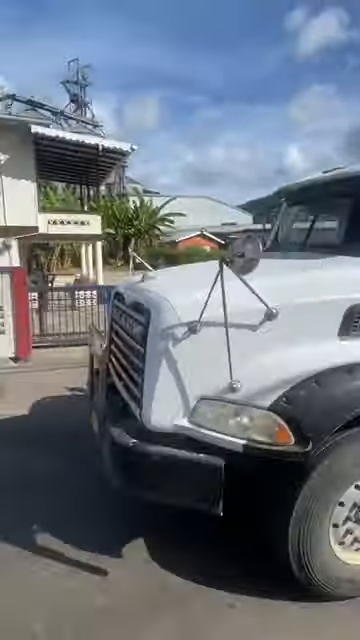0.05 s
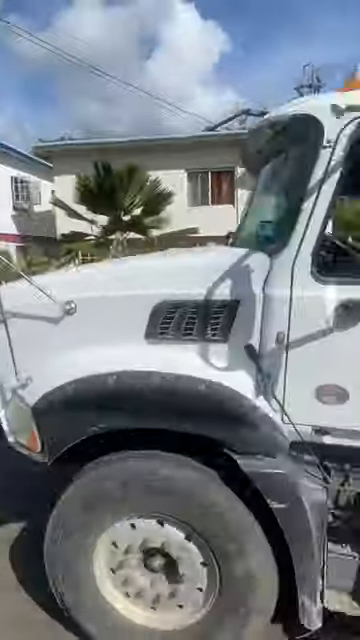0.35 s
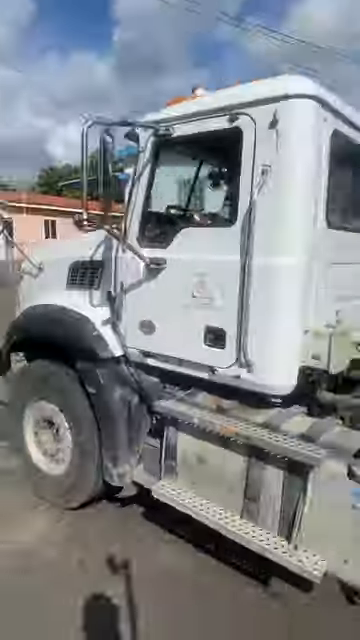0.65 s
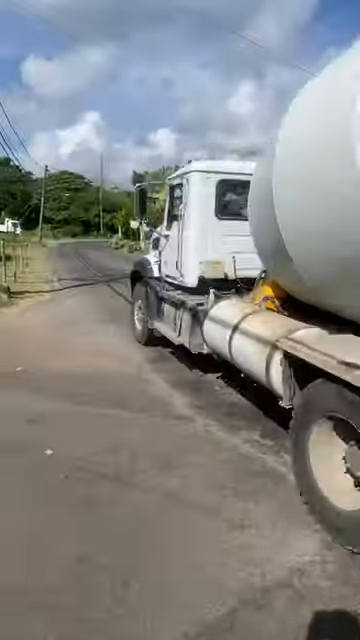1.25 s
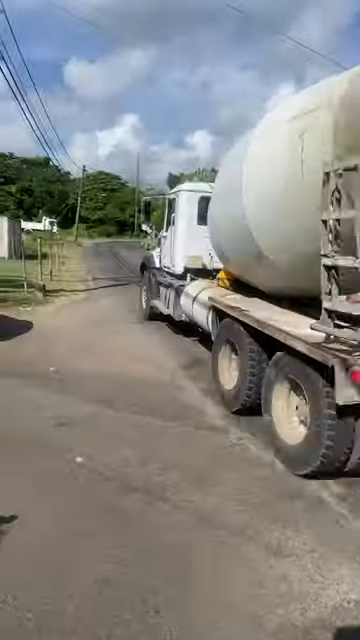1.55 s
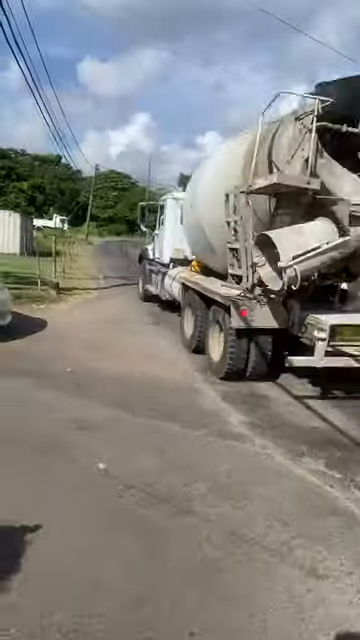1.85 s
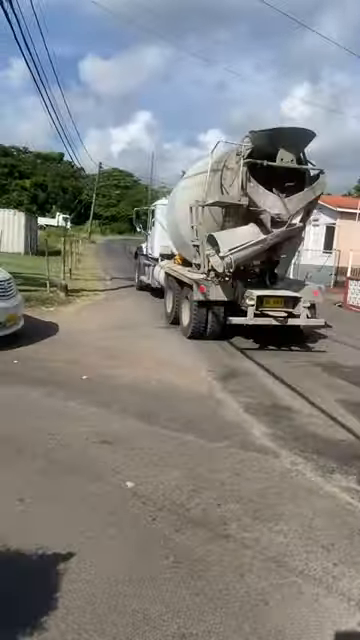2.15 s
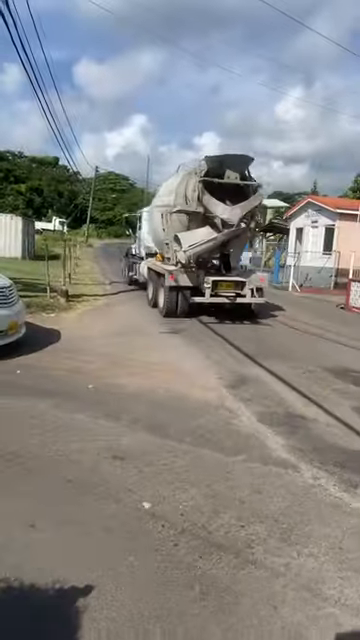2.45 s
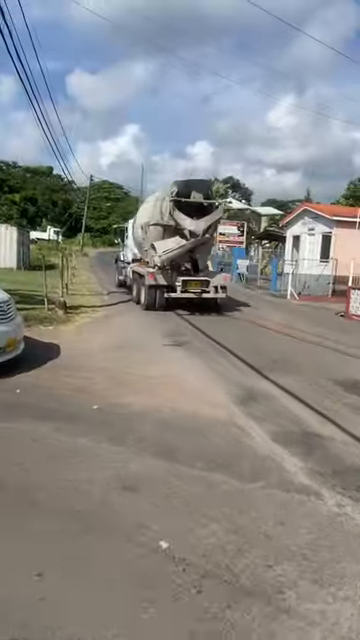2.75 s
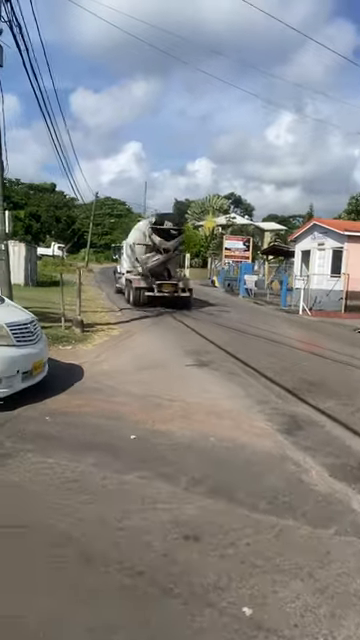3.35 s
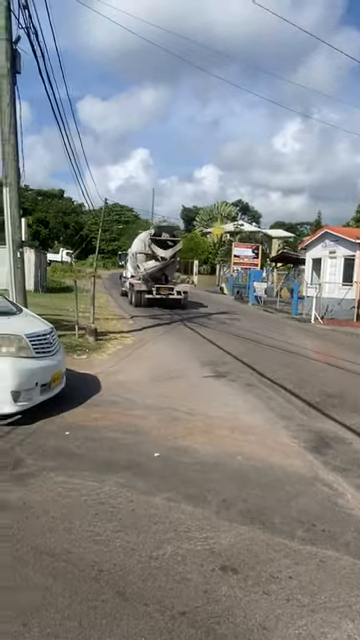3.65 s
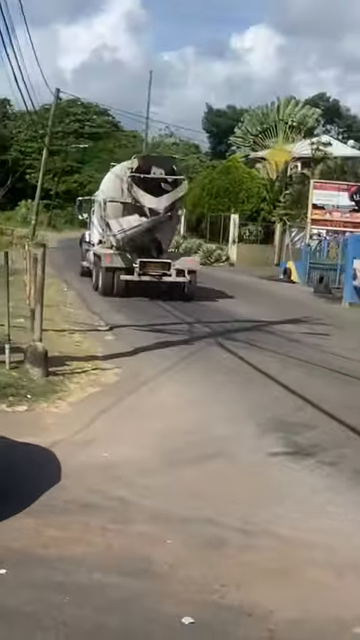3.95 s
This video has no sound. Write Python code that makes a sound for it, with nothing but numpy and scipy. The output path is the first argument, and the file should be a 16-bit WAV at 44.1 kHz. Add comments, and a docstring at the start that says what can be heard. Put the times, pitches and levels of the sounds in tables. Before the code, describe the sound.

Heard in stereo from the roadside, a heavy mixer truck drives close by with diesel rumble, rattling, hiss and tyre noise. Short metallic squeaks and clanks follow, then engine and exhaust grow fainter as it moves off.

```python
"""Concrete mixer truck passing close

From the roadside, in stereo: the truck goes by the microphone and pulls away, easing off at the
very end. Its six-cylinder diesel drones over block rumble, clatter, rattling metal and tyre roar.
Air hisses at the front; something on the turning drum or rear axles scrapes and squeaks as the back
passes, the chassis clanks, and exhaust and tyres rasp from up the road."""
import sys
import numpy as np
from scipy import signal
from scipy.fft import rfft, irfft
from scipy.io import wavfile
from scipy.ndimage import uniform_filter1d, minimum_filter1d

SR = 44100
rng = np.random.default_rng(int(sys.argv[2]) if len(sys.argv) > 2 else 0)


def int16_out(signal):
    """Quantize to a 16-bit WAV file."""
    q = np.round(np.clip(np.atleast_2d(signal).T, -1, 1) * 32767)
    wavfile.write(sys.argv[1], SR, q.astype(np.int16))


N = 176400
TIME, HZ = np.arange(N) / SR, np.fft.rfftfreq(N, 1 / SR)

# engine speed: t/s, firing rate/Hz
FIRING_RATE = [(0, 61.7), (.25, 59.8), (.5, 62.3), (1.4, 60.9), (2, 63), (2.75, 64.5), (3.35, 64.8),
               (3.58, 68.6), (3.9, 65)]
# strong engine tones at 0.99, 2 and 2.5 times the firing rate: t/s, level/dB
FIRING_DB = [(0, -17.5), (.6, -18), (.95, -16.5), (1.25, -18.5), (1.65, -28), (2.04, -30), (2.27, -23.5),
             (2.65, -21), (3.2, -25.5), (3.6, -22), (3.85, -33)]
OCTAVE_DB = [(.08, -19), (.25, -16.5), (.5, -25), (.72, -32), (.9, -24.5), (1.2, -21.5), (1.37, -29),
             (1.5, -19.5), (1.9, -18), (2.48, -21.5), (2.63, -16), (3.15, -24), (3.32, -31), (3.47, -23),
             (3.7, -29)]
HALF_ORDER_DB = [(0, -28), (.5, -23.5), (1.05, -24), (1.35, -44), (1.9, -29), (4, -33)]
# weak engine tones: multiple of the firing rate, level/dB relative to RUMBLE_DB
WEAK_ORDERS = [(3.5, -17.5), (5, -18), (5.25, -16)]
# whine of an engine-driven fan or pump: t/s, level/dB
WHINE_DB = [(0, -21), (.5, -23.5), (.75, -36), (2, -43.5), (2.8, -29.5), (3.5, -40.5)]
# block rumble, diesel clatter, air at the front, rasp from behind: t/s, level/dB before trim
RUMBLE_DB = [(0, -20.5), (.68, -22), (1.25, -19.5), (1.5, -24.5), (1.72, -22.5), (2.2, -29), (2.7, -26),
             (3.02, -30), (3.2, -24.5), (3.5, -30.5)]
CLATTER_DB = [(0, -27.5), (.7, -29), (1.27, -29.5), (1.5, -38), (1.72, -32), (1.88, -33.5), (2.2, -43.5),
              (4, -40.5)]
HISS_DB = [(0, -29.5), (.13, -30.5), (.23, -38), (.85, -39.5), (1.5, -45.5), (1.9, -45.5), (2.1, -55),
           (4, -59.5)]
RASP_DB = [(1.7, -70), (2.1, -38.5), (2.45, -40.5), (2.65, -36.5), (3.15, -39), (3.55, -41), (4, -45.5)]
# engine bay growl alongside, tyre roar, low rumble on easing off: t/s, level/dB
GROWL_DB = [(0, -28.5), (.5, -23), (.9, -39.5), (1.5, -63)]
TYRE_DB = [(0, -23), (.3, -26.5), (.95, -23.5), (1.3, -26), (1.52, -29.5), (1.7, -26.5), (2.1, -32.5),
           (2.45, -33.5), (2.7, -31.5), (2.95, -29.5), (3.25, -34.5), (4, -36)]
EASING_DB = [(3.4, -60), (3.8, -26.5)]
# spectra of those seven noises: f/Hz, relative level/dB
RUMBLE_SPECTRUM = [(20, -32), (40, -14.5), (75, -1.5), (105, -1.5), (180, -1.5), (240, 0), (400, -3),
                   (520, -11), (700, -16.5), (1200, -53)]
CLATTER_SPECTRUM = [(1100, 3), (1800, -1), (2200, 3), (2700, 0.5), (3300, -2.5), (4100, -4), (4800, -10),
                    (6200, -8.5), (8000, -76)]
HISS_SPECTRUM = [(3000, -20), (5500, -4), (7300, -1.5), (9200, 0), (11000, -2), (13000, -3), (14000, -7),
                 (15700, -10)]
RASP_SPECTRUM = [(900, -14), (1500, 0), (1850, -4), (2250, 1), (2700, -2), (3280, -16), (4300, -.5),
                 (5000, -7.5), (6000, -8), (7200, -13), (9000, -13), (13000, -20), (15500, -42)]
GROWL_SPECTRUM = [(250, -44), (380, 6), (470, 3), (600, 4), (750, -26), (1200, -40)]
TYRE_SPECTRUM = [(250, -9.5), (500, -4), (700, -1.5), (900, 1.5), (1150, -1.5), (1450, -5.5), (1700, -5),
                 (2100, -13.5), (3200, -43)]
EASING_SPECTRUM = [(25, -17), (60, 7), (200, -48)]
# resonances of the shaken parts and of the rubbing metal: f/Hz, width/Hz, relative level/dB
RATTLE_MODES = [(1130, 70, 1), (2270, 200, 0), (2950, 130, -4), (4350, 300, -4)]
SCRAPE_MODES = [(2230, 170, -1), (2520, 170, -1), (3900, 500, -3.5), (5260, 130, -1.5), (6100, 400, -9),
                (10700, 500, -13)]
# rattle and scrape as they pass the microphone: t/s, gain/dB
RATTLE_DB = [(0, -34.5), (1.2, -34.5), (2.2, -43.5), (2.7, -43.5), (4, -50)]
SCRAPE_DB = [(0, -69), (.7, -57), (1, -39.5), (1.35, -38.5), (1.55, -43), (1.63, -36.5), (1.92, -35.5),
             (2.15, -48), (2.6, -75)]
# squeaks of the rubbing metal: t/s, level/dB, f/Hz
SQUEAKS = [(.975, -33, 5350), (1.04, -33, 5280), (1.1, -28.5, 5210), (1.17, -24.5, 5290),
           (1.272, -30, 5210), (1.342, -30, 5240), (1.62, -27, 5310), (1.684, -23.5, 5190),
           (1.763, -27, 5170), (1.84, -32, 5200), (1.962, -31, 5130)]
# chassis knocks: t/s, level/dB, f/Hz, strength of the crack (0-1)
KNOCKS = [(1.686, -26, 2500, 1), (1.745, -25, 2000, .2), (1.753, -25, 3950, .2), (1.857, -25, 2220, .5),
          (1.958, -28, 2470, .3), (2.06, -30, 2200, .1)]
# stereo image, with left and right nearly opposed around 7-8 kHz:
# f/Hz, left minus right/dB, coherence (0-1), phase lead of the left/rad
STEREO_IMAGE = [(60, -.7, 1, -.18), (125, -2.4, .998, -.07), (330, -5.5, .99, -.15), (520, -5.5, .9, -.4),
                (640, -6.5, .6, -1), (740, -9, .3, 0), (870, -9, .65, .4), (1200, -4, .8, .1),
                (1750, 0, .98, 0), (2200, -1, .5, 0), (2900, -1.5, .15, 0), (4100, -2, .5, 1.1),
                (5200, -3, .7, .6), (6100, 0, .65, 1.7), (6750, 0, .95, 2.8), (7900, 0, .95, 3.4),
                (8600, 0, .65, 4.6), (10000, 0, .9, 6.2), (11400, 0, .9, 6.3), (13100, 0, .95, 9.2),
                (14600, 0, .9, 9.6), (15400, 0, .8, 12)]


def engine_drone(firings):
    """Tones locked to the firing rate, a throb from unequal cylinders, and a fan or pump whining."""
    def tone(multiple, db, wobble_db, wave=np.sin):
        return -np.sqrt(2) * amp(db + wobble_db * drift(8.2)) * wave(2 * np.pi * multiple * firings)
    strong = tone(0.99, curve(FIRING_DB), .5, np.cos) + tone(2, curve(OCTAVE_DB), 1, np.cos)
    half_order = tone(2.5, curve(HALF_ORDER_DB), 1)
    throb = sum(tone(multiple, db=-34.5, wobble_db=3.5) for multiple in (1.5, 1.75))
    weak = sum(rng.choice([-1, 1]) * tone(multiple, curve(RUMBLE_DB) + db, 3.5)
               for multiple, db in WEAK_ORDERS)
    whine = tone(4.865, curve(WHINE_DB), 1)
    return strong + half_order + throb + weak + whine


def engine_noise(firings):
    """The block rumbles and clatters; the engine bay growls while the cab is alongside."""
    rumble = pulsed_noise(firings, RUMBLE_SPECTRUM, RUMBLE_DB, throb=.31, flicker_db=.3, trim_db=1)
    growl = pulsed_noise(firings, GROWL_SPECTRUM, GROWL_DB, throb=.28, flicker_db=2)
    clatter = pulsed_noise(firings, CLATTER_SPECTRUM, CLATTER_DB, throb=.013, flicker_db=1.26, trim_db=3)
    return rumble + growl + clatter


def tyre_roar(firings):
    """Tyres roar on the road, loudest close to the microphone."""
    return pulsed_noise(firings, TYRE_SPECTRUM, TYRE_DB, throb=.028, flicker_db=.96)


def air_hiss(firings):
    """Air hisses at the front and fades once the cab is past."""
    return pulsed_noise(firings, HISS_SPECTRUM, HISS_DB, throb=.024, flicker_db=1, trim_db=3)


def rattle(firings, ticks_per_s=380):
    """Ticks of uneven size, bunched around each firing, ring small metal parts."""
    chance = ticks_per_s / SR * (1 + np.cos(2 * np.pi * firings) / 2)
    def part(hz, width_hz):
        ticks = (rng.random((2, N)) < chance) * rng.standard_normal((2, N))
        return unit(signal.lfilter(*signal.iirpeak(hz, hz / width_hz, fs=SR), ticks))
    parts = sum(amp(db) * part(hz, width) for hz, width, db in RATTLE_MODES)
    return unit(parts) * amp(curve(RATTLE_DB))


def scrape(flicker_db=1.5, jolt_db=1.8):
    """Rubbing metal on the drum or rear axles rings unevenly, in small jolts."""
    modes = sum(amp(db + flicker_db * drift(27)) * ring(hz, width) for hz, width, db in SCRAPE_MODES)
    return modes * amp(curve(SCRAPE_DB) + jolt_db * drift(25))


def squeaks(length_s=.046, sag_hz_per_s=1900, slip_hz=140):
    """The rubbing catches in short squeals that sag in pitch, roughened by uneven slips."""
    jitter_hz = 55 * drift(slip_hz)
    roughness = unit(amp(3.5 * drift(slip_hz)))
    def squeal(start, hz):
        age = np.clip(TIME - start, 0, length_s)
        pitch = hz + jitter_hz - sag_hz_per_s * (age - length_s / 2)
        return np.sin(np.pi * age / length_s) * np.sin(2 * np.pi * np.cumsum(pitch) / SR)
    return roughness * sum(amp(db) * squeal(start, hz) for start, db, hz in SQUEAKS)


def chassis_knocks(rise_s=.002, fall_s=.015):
    """Loose parts clank as the rear goes by: a rough ring and a shorter crack."""
    def knock(start, hz, strength):
        body = burst(start, rise_s, fall_s) * ring(hz, width_hz=290)
        crack = burst(start, rise_s, fall_s / 2) * ring(5000, width_hz=5000)
        return body + strength * crack
    return sum(amp(db) * knock(start, hz, strength) for start, db, hz, strength in KNOCKS)


def rear_rasp(firings):
    """Exhaust and tyres, heard from behind as the truck pulls away."""
    return pulsed_noise(firings, RASP_SPECTRUM, RASP_DB, throb=.041, flicker_db=1, trim_db=.5)


def easing_rumble():
    """A low, uneven rumble from up the road as the engine eases off."""
    return colour(rng.standard_normal(N), EASING_SPECTRUM) * amp(curve(EASING_DB))


def stereo_image(pair):
    """Level difference, coherence and phase by frequency; the second signal goes to the left only."""
    def through(x, response):
        return fir(x, np.roll(irfft(response, N), 1024)[:2049])
    balance_db, coherence, lead = (across(STEREO_IMAGE, column) for column in (1, 2, 3))
    right = 2 / (1 + amp(balance_db))
    left = right * amp(balance_db) * np.exp(1j * lead)
    common = through(pair[0], left * coherence)
    unrelated = through(pair[1], left * np.sqrt(1 - coherence ** 2))
    return np.array([common + unrelated, through(pair[0], right)])


def pulsed_noise(firings, spectrum, levels, throb, flicker_db, trim_db=0):
    """Two unrelated noises that swell with every firing and flicker at random."""
    swell = (1 + throb * np.cos(2 * np.pi * firings)) * amp(flicker_db * drift(25))
    return colour(swell * rng.standard_normal((2, N)), spectrum) * amp(curve(levels) + trim_db)


def ring(hz, width_hz):
    """Two unrelated noises in one resonance."""
    return unit(irfft(rfft(rng.standard_normal((2, N))) / (1 + ((HZ - hz) / width_hz) ** 2), N))


def burst(start, rise_s, fall_s):
    """A short rise, then an exponential fall."""
    age = np.maximum(TIME - start, 0)
    return np.minimum(age / rise_s, 1) * np.exp(-np.maximum(age - rise_s, 0) / fall_s)


def drift(rate_hz):
    """Random wander below about rate_hz, at rms 1."""
    return unit(irfft(rfft(rng.standard_normal(N)) / (1 + (HZ / rate_hz) ** 4), N))


def colour(x, spectrum):
    """Gives a signal a spectrum, at rms 1."""
    return unit(irfft(rfft(x) * amp(across(spectrum)), N))


def fir(x, taps):
    """Filters without delay; the ends are mirrored so that they do not click."""
    return signal.oaconvolve(np.pad(x, len(taps) // 2, "reflect", reflect_type="odd"), taps, "valid")


def curve(points):
    """Reads a table by time, at every sample."""
    return np.interp(TIME, *np.transpose(points))


def across(points, column=1):
    """Reads a column of a table by frequency, on a log axis."""
    rows = np.array(points)
    return np.interp(np.log(HZ + 1), np.log(rows[:, 0] + 1), rows[:, column])


def amp(db):
    """Decibels to gain."""
    return 10 ** (np.asarray(db) / 20)


def unit(x):
    """Scales to rms 1."""
    return x / np.sqrt(np.mean(x ** 2) + 1e-20)


def scene():
    """The passing truck, heard in stereo from the roadside."""
    firing_hz = curve(FIRING_RATE) * (1 + .003 * drift(12.53))
    firings = np.cumsum(firing_hz) / SR
    pair = (engine_noise(firings) + tyre_roar(firings) + air_hiss(firings) + rear_rasp(firings)
            + easing_rumble() + rattle(firings) + scrape() + chassis_knocks())
    pair[0] += engine_drone(firings) + squeaks()
    return stereo_image(pair)


def record(dry):
    """A limiter holds the highest peaks down; a low-pass cuts the top treble."""
    ceiling, cutoff_hz = .92, 15750
    needed_gain = np.minimum(1, ceiling / (abs(dry).max(0) + 1e-9))
    limited = dry * uniform_filter1d(minimum_filter1d(needed_gain, size=401), size=401)
    lowpass = signal.firwin(511, cutoff_hz, window=("kaiser", 9), fs=SR)
    return np.array([fir(channel, lowpass) for channel in limited])


dry = scene()
out = record(dry)
int16_out(out)
```